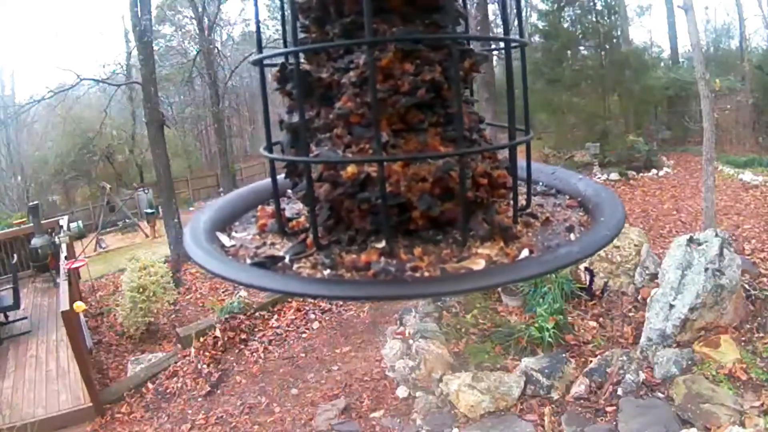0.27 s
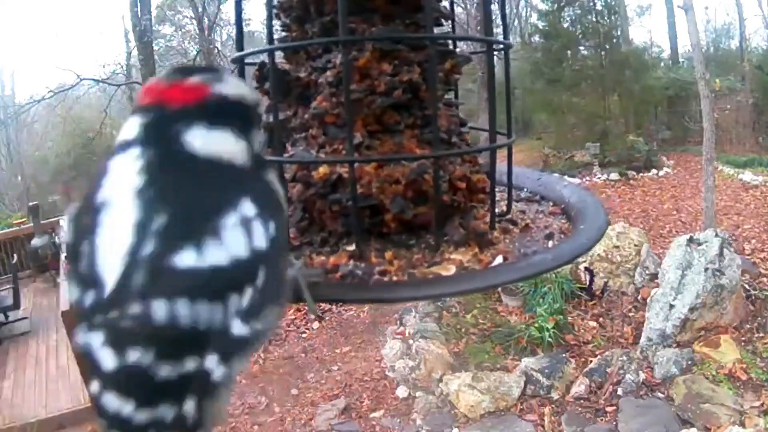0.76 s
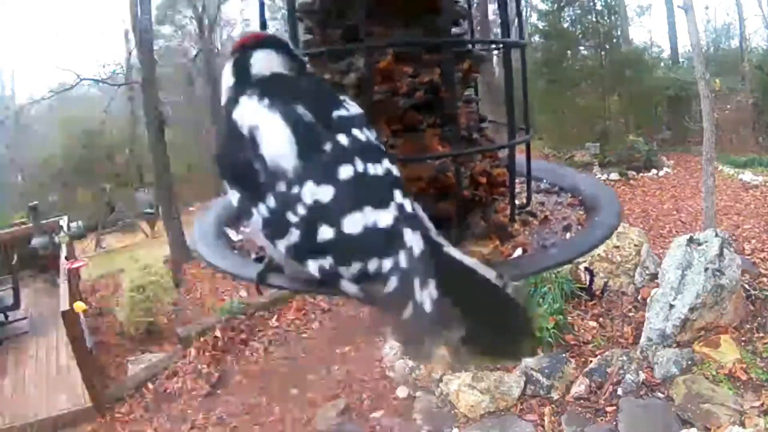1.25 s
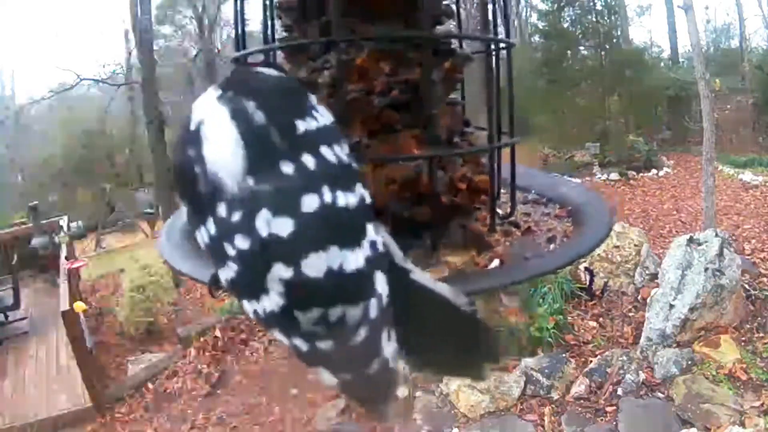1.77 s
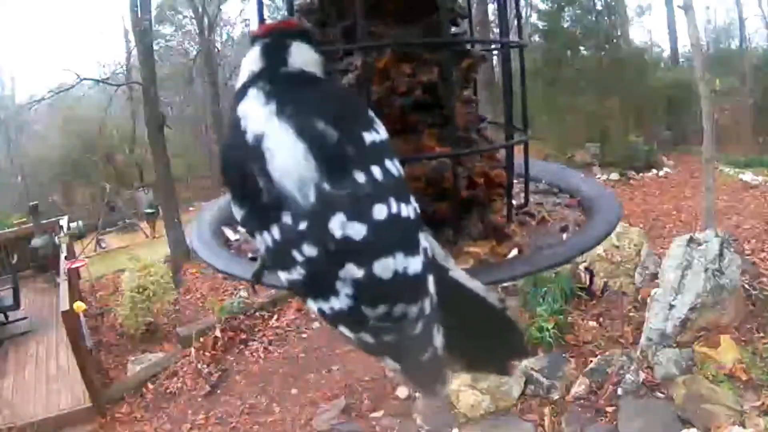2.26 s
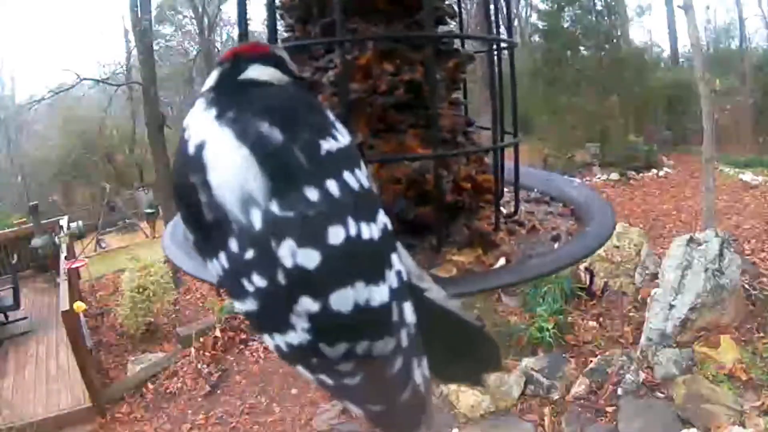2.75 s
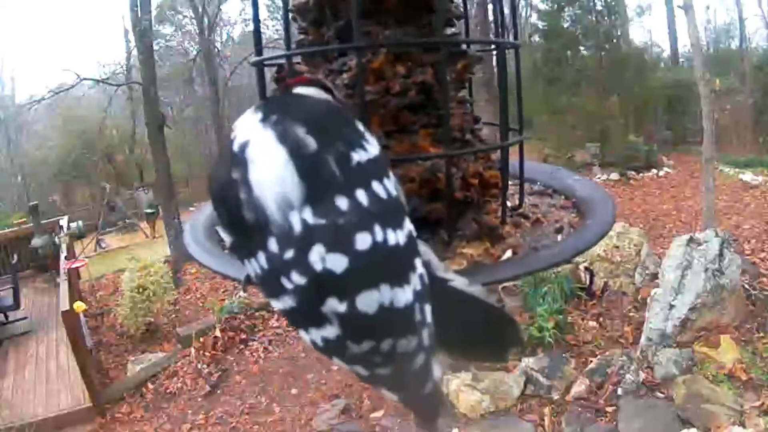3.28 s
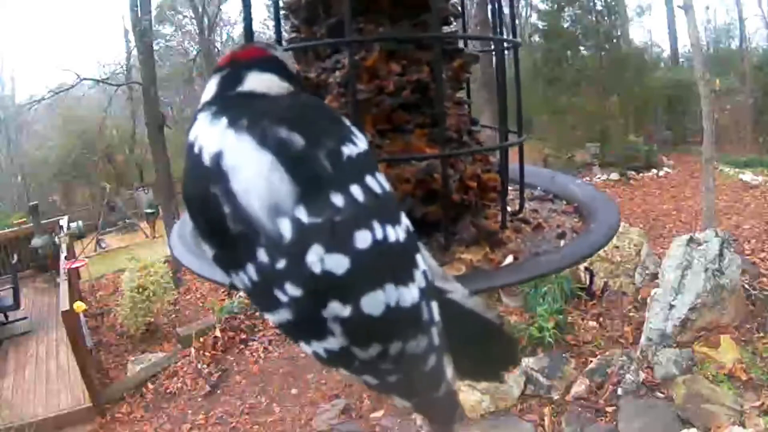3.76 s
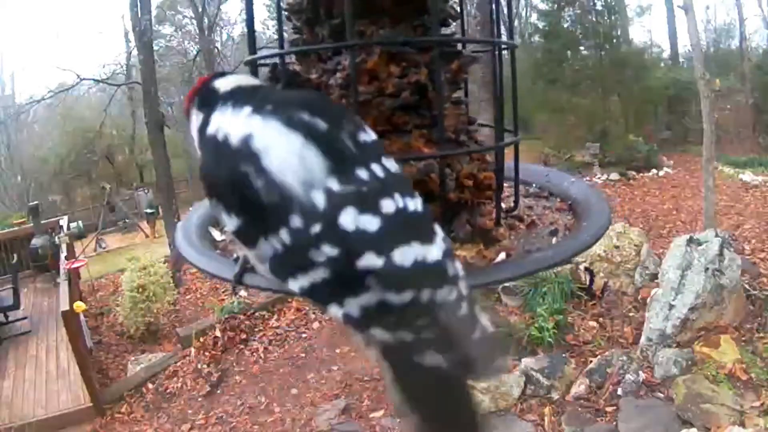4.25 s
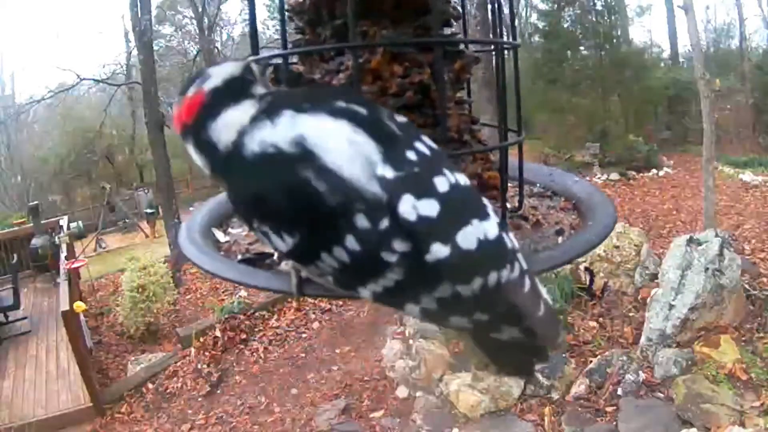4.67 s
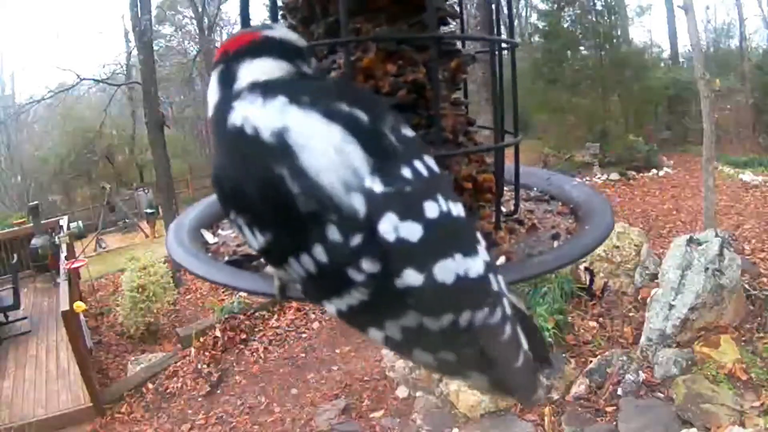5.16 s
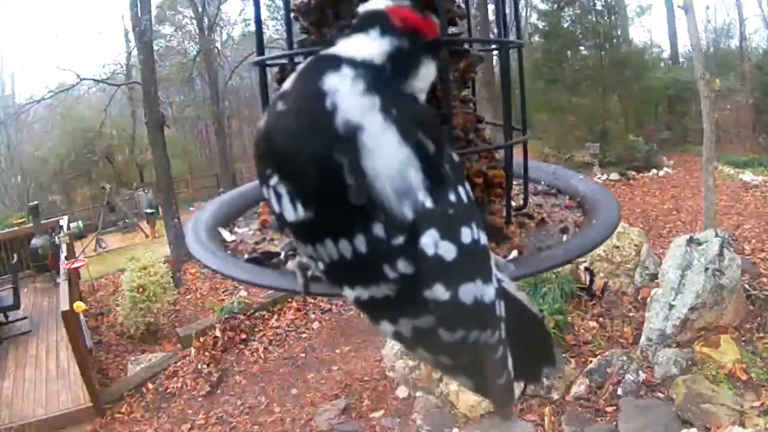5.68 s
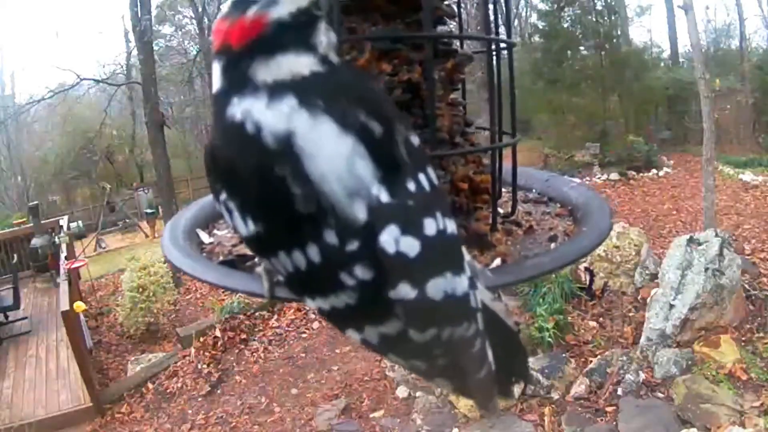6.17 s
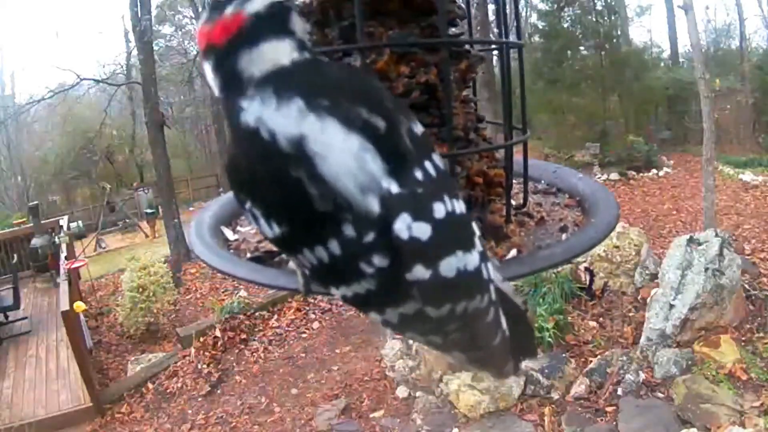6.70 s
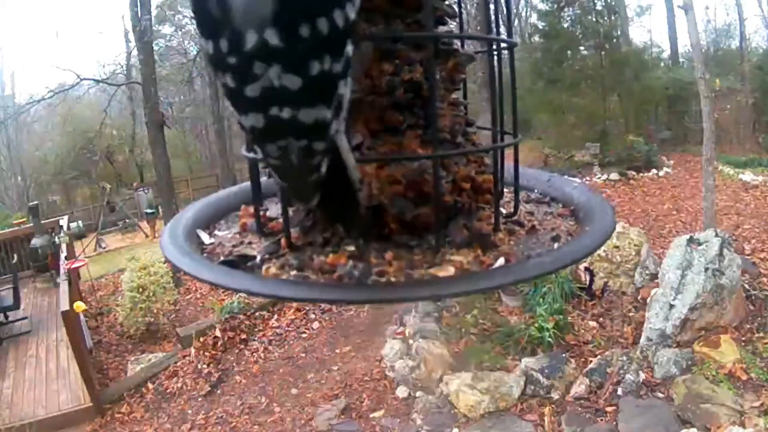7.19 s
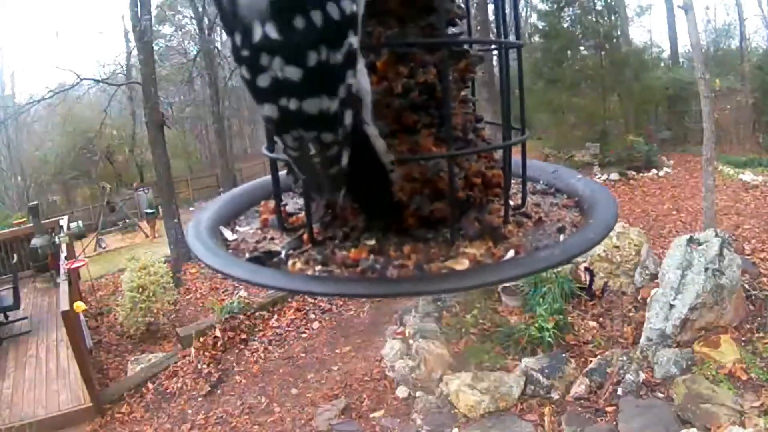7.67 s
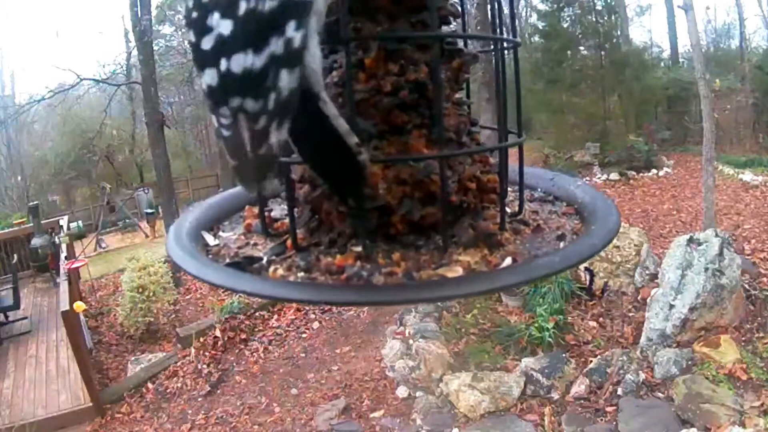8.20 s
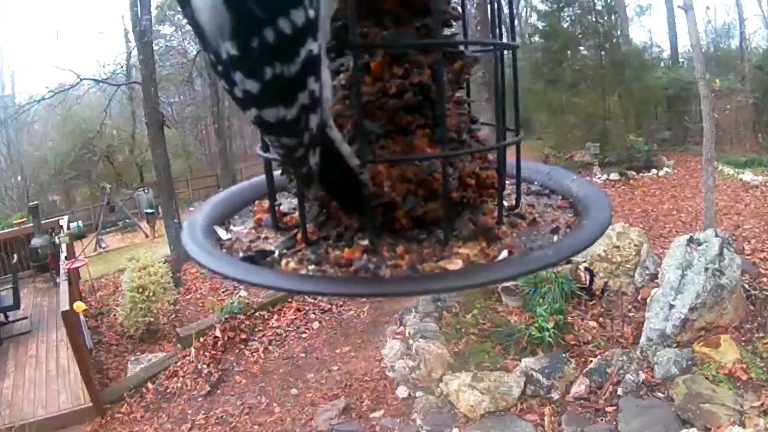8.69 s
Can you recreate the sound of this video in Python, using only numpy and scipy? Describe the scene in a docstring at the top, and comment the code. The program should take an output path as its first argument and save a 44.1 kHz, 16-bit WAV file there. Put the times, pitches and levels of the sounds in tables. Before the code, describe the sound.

A woodpecker at a caged seed feeder in a wooded yard, heard very close in mono with dull treble. Early claw clicks and feather brushing lead to low, booming wing gusts that overload. Then come sparse hollow beak taps, faint seed clicks and echoing tree-bird chirps over soft rumble and drone. After a calm spell, metallic rattling and firmer knocks with tray thuds burst out, and the background grows rougher.

```python
"""Small birds chirp in the trees over a distant rumble and a wavering hum; then claws tick close by.
A woodpecker flutters past a small camera, lands on a wire seed feeder and pecks at it. Its wing strokes
are slowing swings of air that overload the microphone; claws and beak are knocks, clicks, scratches and
ringing wires, with thuds in the tray. Chirps are gliding tones with echoes; the background is shaped noise."""
import sys
import numpy as np
from scipy import signal
from scipy.io import wavfile
from scipy.ndimage import uniform_filter1d

SR = 44100
rng = np.random.default_rng(int(sys.argv[2]) if len(sys.argv) > 2 else 0)


def wrap_up_sound(samples):
    """Save the sound to the file named by the first command line argument, as 16-bit audio."""
    columns = np.atleast_2d(samples).T
    # keep every value between -1 and 1, then stretch to whole-number steps
    tamed = np.clip(columns, -1, 1)
    steps = np.round(tamed * 32767).astype(np.int16)
    wavfile.write(sys.argv[1], SR, steps)


N = 394254

# Hard pecks that carry through to the tray. Each row: start in seconds, knock strength in dB,
# click in dB against the knock, thud strength in dB, tray ring strength in dB.
PECKS = [(2.5043, -37, -15, -33, -51), (2.9771, -33, -15, -51, -51), (5.906, -63, -7, -34, -60),
         (7.0714, -28, -18, -49, -47), (7.183, -43.5, 12.5, -42, -34), (7.3828, -26.5, -14, -50, -44),
         (7.6097, -38.5, 4.5, -25.5, -50), (8.071, -31, -12, -25.5, -47.5), (8.2517, -39, 8.5, -19, -52),
         (8.798, -30.5, 2.5, -16, -52)]
# Light, hollow beak taps on the seed. Each row: start in seconds, knock strength in dB, knock in Hz.
SEED_TAPS = [(.2605, -34, 4700), (1.8986, -36.5, 3460), (2.5168, -39.5, 2000), (2.8612, -38.5, 1830),
             (3.1205, -45, 1980), (3.129, -46, 1970), (5.2367, -40, 3360), (5.752, -49.5, 4200),
             (6.357, -46, 4300), (7.172, -40, 3500), (7.251, -42, 4800), (7.893, -40, 2200),
             (8.054, -46, 3300), (8.118, -40, 1840)]
# Claws clicking on the wires. Each row: start in seconds, knock strength in dB, knock in Hz.
CLAW_TICKS = [(0.2417, -34.5, 6420), (0.2796, -43, 5100), (0.294, -38.5, 2860), (.334, -44.5, 5200),
              (0.5841, -32, 3320), (1.0189, -42.5, 6360), (1.037, -39, 4330), (1.1035, -40, 4400),
              (1.9605, -46, 1790), (2.0468, -47.5, 2360), (2.4247, -44, 6400), (2.9106, -41.5, 6440),
              (3.57, -56.5, 5500), (3.87, -53, 5470), (4.2293, -49, 4640), (4.2637, -40, 3270),
              (4.2766, -44, 2230), (5.152, -50.5, 4400), (5.326, -55, 1110), (5.362, -63, 1510),
              (6.968, -42, 6370), (7.265, -48, 3900), (7.318, -46, 5740), (7.716, -41.5, 4550),
              (7.8061, -37, 4730), (7.852, -40, 5000), (7.8793, -40.5, 2100), (8.006, -44.5, 4930)]
# Claws rattling the wires. Each row: start in seconds, level in dB, centre in Hz of the wires that answer.
RATTLES = [(.258, -60, 2850), (.292, -52, 2840), (1.019, -50, 4000), (1.043, -52.5, 2400),
           (4.228, -51, 4520), (4.263, -49, 3330), (6.967, -48, 2280), (7.07, -35.5, 2300),
           (7.089, -33.5, 2110), (7.108, -49, 2240), (7.13, -41.5, 2220), (7.235, -54.5, 2300),
           (7.806, -40, 3760)]
# Wires of the cage. Each row: mode in Hz, strength in dB, 60 dB decay in seconds before the grip damps it.
CAGE_MODES = [(1740, -6, .15), (2017, -5, .15), (2246, -4, .3), (2284, 0, .4), (2364, -4, .2),
              (2810, -5, .15), (3042, -9, .2), (3222, -10, .12), (3510, -5, .15), (3967, -4, .16),
              (4480, -2, .17), (4790, -3, .12), (5200, -4, .12), (5916, -4, .12), (7140, -6, .12)]
# The seed tray under the cage. Each row: mode in Hz, strength in dB, 60 dB decay in seconds.
TRAY_MODES = [(611.2, 2, 0.18), (735, 4.5, 0.09), (1016, -4.5, 0.042)]
# Air pushed at the microphone by each wing stroke. Each row: start in seconds, strength in dB before
# overload, first swing in Hz, spread in half swings.
WING_GUSTS = [(.552, -19, 80.5, 1.62), (.638, 2.5, 110.7, 0.97), (.678, -25.5, 50.3, 0.93),
              (.825, -24, 49.3, 0.97), (0.882, -17, 62, 0.27), (0.898, -25.5, 74, 1.13),
              (0.933, -19, 57.4, 0.41), (0.948, -26, 62.4, 0.61), (0.943, -31, 52.4, 1.34)]
# Feathers and claws brushing. Each row: start in seconds, length in seconds, level in dB, colour in Hz.
BRUSHES = [(0.252, 0.096, -54.5, 5000), (0.518, 0.1, -43.5, 5700), (0.593, 0.079, -44.5, 1000),
           (0.824, 0.042, -57, 1980), (0.845, 0.038, -51, 5000), (0.873, 0.027, -52, 2600),
           (0.922, 0.036, -52.5, 2300), (1.01, 0.074, -59, 5500), (1.936, 0.11, -57.5, 6640),
           (2.041, 0.18, -64.5, 5100), (2.505, 0.056, -53.5, 1700), (2.549, 0.054, -48, 6100),
           (2.677, 0.077, -54.5, 6960), (2.746, 0.045, -54, 6400), (5.314, 0.086, -64, 1760),
           (5.904, 0.036, -63, 1420), (6.894, 0.16, -51.5, 6940), (7.06, 0.048, -54, 4300),
           (7.159, 0.22, -64.5, 5000), (7.702, 0.047, -48.5, 4950), (7.807, 0.087, -58, 4700),
           (7.918, 0.095, -58, 4200)]
# Bird notes from the trees, mostly high, some buzzing. Each row: start in seconds, length in seconds,
# top in Hz before any buzz, level in dB before the echoes, buzz from 0 to 1.
BIRD_NOTES = [(0.076, 0.045, 7700, -56, 0.4), (0.088, 0.066, 6700, -54, .45),
              (0.105, 0.16, 1407, -67.5, 0.1), (2.251, 0.049, 3740, -70, .2),
              (2.937, 0.05, 7160, -58.5, .25), (6.003, .032, 7100, -63, 0.8),
              (6.312, 0.061, 7060, -53, 0.47), (8.781, 0.048, 3330, -59.5, 0.64)]
# Clear whistles from the trees. Each row: start in seconds, length in seconds, top in Hz before
# any buzz, level in dB before the echoes.
BIRD_WHISTLES = [(1.38, 0.028, 3270, -70), (2.247, 0.053, 2977, -59.5), (2.819, 0.05, 3250, -65.5),
                 (3.001, 0.062, 3310, -64.5), (3.094, 0.065, 3200, -66), (6.941, 0.063, 3480, -60.5)]
# Level of the background as the camera hears it, with rustle close by. Each row: time in seconds,
# rumble level in dB (150-1000 Hz), treble hiss and rustle level in dB (3-8 kHz).
BACKGROUND_LEVELS = [(0, -57, -69.5), (0.501, -55.5, -65), (1.15, -59, -71.5), (1.85, -60, -72),
                     (2.4, -59, -70), (2.85, -60, -66), (3.2, -61, -72.5), (4.6, -60.5, -72),
                     (6.851, -60.5, -72.5), (7.1, -52.5, -58), (7.45, -51.5, -64), (8.1, -52.5, -63.5),
                     (8.94, -53, -66)]
# Colour of the distant rumble. Each row: frequency in Hz, density in dB per Hz.
RUMBLE_SPECTRUM = [(12, -38.5), (20, -2), (69, -2), (135, -12), (500, -15.5), (1000, -23), (3000, -41)]
# Colour of the hiss and rustle. Each row: frequency in Hz, density in dB per Hz.
HISS_SPECTRUM = [(900, -20.5), (2080, -3), (5000, -8), (7400, -6), (8300, -12)]
# Wavering low drones. Each row: centre in Hz, resonance width in Hz, relative level in dB.
DRONES = [(72, 2.5, 0), (120.5, 1.5, -3)]

PECK_HZ = 2093
TICK_CLICK_DB, TAP_CLICK_DB = 2, -9  # click against the knock
THUD_S = 0.0017
WIRE_HZ = CAGE_MODES[3][0]  # the strongest wire, reference for damping and flutter
GRIP_DB_PER_S, GRIP_SLOPE = 47, 0.83  # damping by the grip at WIRE_HZ; exponent of its growth with pitch
STRETCH = 1.38  # each half swing of air against the one before
PEAK_HALF, PEAK_LAG = 1.29, 0.68  # the strongest half swing comes later in a long gust
NOTE_START = .91  # starting pitch as a share of the top
WHISTLE_START_HZ, WHISTLE_BUZZ = 2267, 0.16
QUIET_DB = -60  # rumble level at which the drones sit at DRONE_DB
DRONE_DB, DRONE_FOLLOW = -62, 1.24  # dB; dB gained per dB of rumble
CEILING = .202  # amplitude at which the converter saturates
SLOPE_HZ, EDGE_HZ = 7804, 8230  # the treble starts to sink a little below the band limit


def gain_of(db):
    """Amplitude factor for a level in dB."""
    return 10 ** (np.asarray(db) / 20)


def evened(x):
    """Scale to unit RMS."""
    return x / np.sqrt(np.mean(x ** 2) + 1e-20)


def add(mix, s, sound):
    """Lay a sound into the mix at s seconds, cut off at the end."""
    part = mix[round(s * SR):][:len(sound)]
    part += sound[:len(part)]


def resonate(x, hz, width):
    """A resonance of gain 1 at hz: shift hz down to zero, smooth, shift back."""
    turn = np.exp(2j * np.pi * hz * np.arange(len(x)) / SR)
    r = np.exp(-np.pi * abs(width) / SR)
    return 2 * (turn * signal.lfilter([1 - r], [1, -r], x / turn)).real


def contact_click(t):
    """A dying noise burst with a sharp first contact."""
    click = rng.standard_normal(len(t)) * np.exp(-t / 0.0029) * 0.79
    click[:3] += 1.6
    return click


def beak_and_claws():
    """Each contact is a hollow, fast-dying knock with a click on top."""
    out, t = np.zeros(N), np.arange(1500) / SR
    hard = [(s, db, PECK_HZ, click_db) for s, db, click_db, _, _ in PECKS]
    claws = [(s, db, hz, TICK_CLICK_DB) for s, db, hz in CLAW_TICKS]
    taps = [(s, db, hz, TAP_CLICK_DB) for s, db, hz in SEED_TAPS]
    for s, db, hz, click_db in hard + claws + taps:
        knock = np.sin(2 * np.pi * hz * t) * np.exp(-t / 0.0015) * np.minimum(t / 0.00062, 1)
        add(out, s, gain_of(db) * (knock + gain_of(click_db) * contact_click(t)))
    return out


def ringing(modes, colour_db, t):
    """Modes die with chance phases and shares, as each blow lands elsewhere; loose joints make them flutter."""
    hz, db, t60 = np.transpose(modes)[:, :, None]
    phase, share = rng.random((2, len(modes), 1))
    flutter = rng.standard_normal((len(modes), len(t)))
    flutter = evened(uniform_filter1d(flutter, size=140, axis=1))
    flutter *= hz / WIRE_HZ  # high modes flutter most
    levels = gain_of(db + colour_db - 4 * share - 60 * t / t60 + 1.9 * flutter)
    tones = levels * np.sin(2 * np.pi * (hz * t + phase))
    return tones.sum(0) * np.minimum(t / 0.0025, 1)


def tray():
    """A hard peck gives the tray a short push and rebound, then a dull ring."""
    out, t = np.zeros(N), np.arange(SR // 2) / SR
    thud = (1 - t / THUD_S) * np.exp(-t / THUD_S) * np.minimum(t / .0005, 1)
    for s, _, _, thud_db, ring_db in PECKS:
        ring = ringing(TRAY_MODES, 0, t) * np.minimum(t / 0.0018, 1)
        add(out, s, gain_of(thud_db) * thud + gain_of(ring_db) * ring)
    return out


def cage():
    """A short gritty shake sets the nearby wires ringing; touching wires chop the ring."""
    out, t = np.zeros(N), np.arange(SR // 2) / SR
    wire_hz = np.array(CAGE_MODES)[:, :1]
    for s, db, hz in RATTLES:
        shake = rng.standard_normal(1200) * np.exp(-t[:1200] / .0025)
        shake[0] = 6.6  # a hard first contact
        nearness_db = -15 * abs(np.log2(wire_hz / hz))  # 15 dB less per octave away
        grip_db = GRIP_DB_PER_S * (hz / WIRE_HZ) ** GRIP_SLOPE
        ring = ringing(CAGE_MODES, nearness_db, t) * gain_of(-grip_db * t)
        ring += gain_of(-9) * ringing(TRAY_MODES, 0, t)  # the tray under the cage hums along
        add(out, s, gain_of(db) * signal.fftconvolve(ring, shake / np.linalg.norm(shake)))
    chatter = uniform_filter1d(rng.standard_normal(N), size=200)
    chatter = evened(uniform_filter1d(chatter, size=200))
    return out * gain_of(2.5 * chatter)


def wings():
    """Each stroke pushes and sucks; every half swing lasts longer than the last as the eddy passes."""
    out, t = np.zeros(N), np.arange(SR // 4) / SR
    for s, db, hz, spread in WING_GUSTS:
        centre = PEAK_HALF + PEAK_LAG * spread ** 2
        halves = np.log(1 + 2 * hz * (STRETCH - 1) * t) / np.log(STRETCH)  # half swings so far
        swell = np.exp(-((halves - centre) / spread) ** 2)
        add(out, s, gain_of(db) * np.sin(np.pi * halves) * swell)
    return out


def brushes():
    """Feathers and claws scrape in grains of uneven size, partly broad and partly coloured."""
    out = np.zeros(N)
    for s, length, db, hz in BRUSHES:
        size, broad, coloured = rng.standard_normal((3, round(length * SR)))
        grains = gain_of(3.6 * evened(uniform_filter1d(size, size=130)))
        scratch = .7 * evened(broad - uniform_filter1d(broad, size=40))
        scratch += evened(resonate(coloured, hz, .35 * hz))
        add(out, s, gain_of(db) * evened(grains * scratch) * np.hanning(len(size)))
    return out


def seed_clicks():
    """Faint seed and husk clicks at chance moments, seven a second on average."""
    strength = np.minimum(rng.exponential(1, N), 2)
    seeds = (rng.random(N) < 7 / SR) * strength
    bright_click = np.diff(contact_click(np.arange(1500) / SR))
    return gain_of(-57) * signal.oaconvolve(seeds, bright_click)[:N]


def birds():
    """Quick glides rise to a top and sink partway, some buzzing, smeared by echoes from the trees."""
    out = np.zeros(N)
    notes = [(*row, NOTE_START * row[2]) for row in BIRD_NOTES]
    whistles = [(*row, WHISTLE_BUZZ, WHISTLE_START_HZ) for row in BIRD_WHISTLES]
    for s, length, top_hz, db, buzz, start_hz in notes + whistles:
        u = np.arange(round(length * SR)) / (length * SR)  # 0 to 1 through the note
        wobble = evened(uniform_filter1d(rng.standard_normal(len(u)), size=30))
        glide = np.sin(np.pi * .72 * u ** .7)
        hz = start_hz + (top_hz - start_hz) * glide + 500 * buzz * wobble
        turn = 2 * np.pi * np.cumsum(hz) / SR
        tone = np.sin(turn) + 0.4 * (1 - u) * np.sin(2 * turn)  # the overtone fades
        add(out, s, np.sqrt(2) * gain_of(db) * tone * signal.windows.tukey(len(u), .35))
    t = np.arange(SR // 2) / SR
    echoes = rng.standard_normal(len(t)) * gain_of(-60 * t / .5) * (t > .008)  # from 8 ms on
    return out + gain_of(-5.5) * signal.fftconvolve(out, echoes / np.linalg.norm(echoes))[:N]


def noise(spectrum, lo_hz, hi_hz, patchy_db):
    """Shaped noise with drifting patches, at unit level between lo_hz and hi_hz."""
    frames, hz = N // 256 + 5, np.fft.rfftfreq(1024, 1 / SR)
    real, imag, patches = rng.standard_normal((3, len(hz), frames))
    patches = uniform_filter1d(patches, size=12, axis=0)  # across frequency
    patches = evened(uniform_filter1d(patches, size=10, axis=1))  # across time
    f, db = np.transpose(spectrum)
    shape = gain_of(np.interp(np.log(hz + 1), np.log(f + 1), db, right=-99))
    bins = (real + 1j * imag) * shape[:, None] * gain_of(patchy_db * patches)
    x = evened(signal.istft(bins, nperseg=1024, noverlap=768)[1][:N])
    share = np.sum(shape[(hz > lo_hz) & (hz < hi_hz)] ** 2) / np.sum(shape ** 2)
    return x / np.sqrt(share)


def background():
    """Far rumble, hiss and close rustle as shaped noise, and drones as noise through narrow resonances."""
    s, low_db, high_db = np.transpose(BACKGROUND_LEVELS)
    t = np.arange(N) / SR
    rumble_db, hiss_db = np.interp(t, s, low_db), np.interp(t, s, high_db)
    rumble = gain_of(rumble_db) * noise(RUMBLE_SPECTRUM, 150, 1000, patchy_db=.7)
    hiss = gain_of(hiss_db) * noise(HISS_SPECTRUM, 3000, 8000, patchy_db=.6)
    drones = np.zeros(N)
    for hz, width, db in DRONES:
        hum = resonate(rng.standard_normal(N), hz, width)
        drones += gain_of(db) * evened(resonate(hum, hz, width))
    drones *= gain_of(DRONE_DB + DRONE_FOLLOW * (rumble_db - QUIET_DB))
    return rumble + hiss + drones


def scene():
    """The woodpecker at the feeder, then the trees and the background behind it, in one channel."""
    feeder = beak_and_claws() + tray() + cage() + seed_clicks()
    return (feeder + wings() + brushes() + birds() + background())[None]


def record(dry):
    """The camera microphone saturates, ducks late after loud gusts, cuts the treble and adds a faint floor."""
    clipped = np.clip(dry, -CEILING, CEILING)
    power_db = 10 * np.log10(abs(uniform_filter1d(clipped[0] ** 2, size=900)) + 1e-12)
    fall = np.arange(N) * 60 / SR  # recovers 60 dB a second
    held_db = np.maximum.accumulate(power_db + fall) - fall
    over_db = np.maximum(held_db + 24, 0)  # the control acts above -24 dB
    late_db = np.roll(uniform_filter1d(over_db, size=1500), shift=2400)  # and reacts late
    ducked = clipped / gain_of(late_db)
    gentle = signal.firwin(121, SLOPE_HZ, window=("kaiser", 5), fs=SR)[None]
    steep = signal.firwin(401, EDGE_HZ, window=("kaiser", 9), fs=SR)[None]
    dulled = signal.oaconvolve(ducked, gentle, "same")
    limited = signal.oaconvolve(dulled, steep, "same")
    return limited + gain_of(-99) * rng.standard_normal(dry.shape)


dry = scene()
out = record(dry)
wrap_up_sound(out)
```